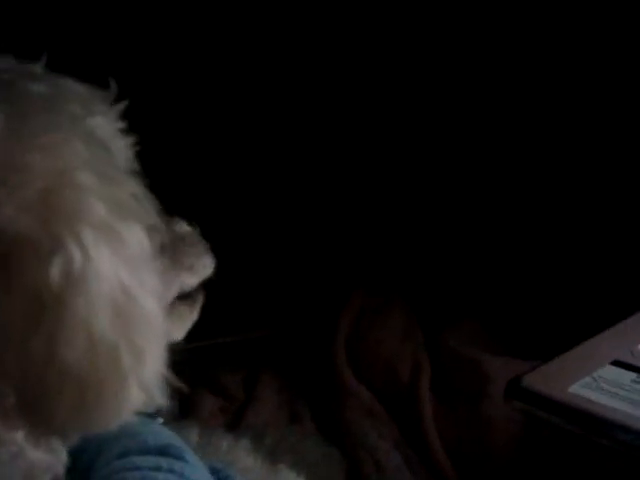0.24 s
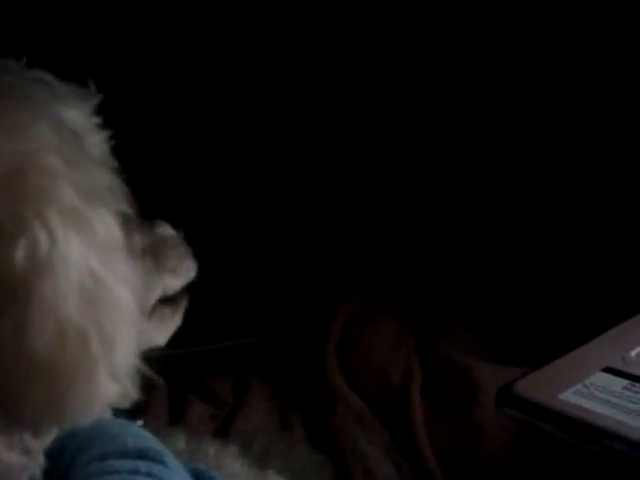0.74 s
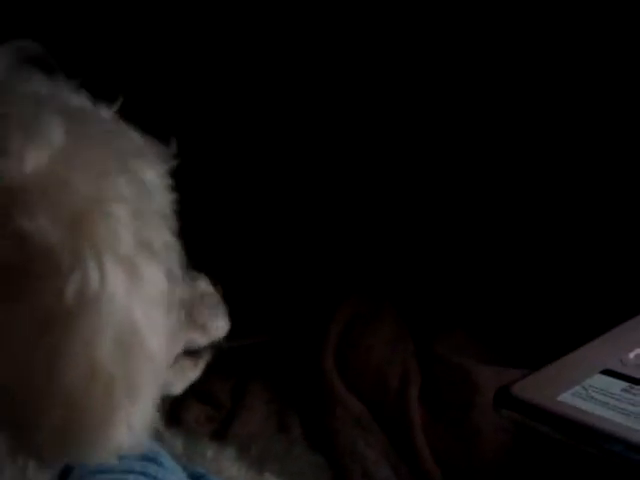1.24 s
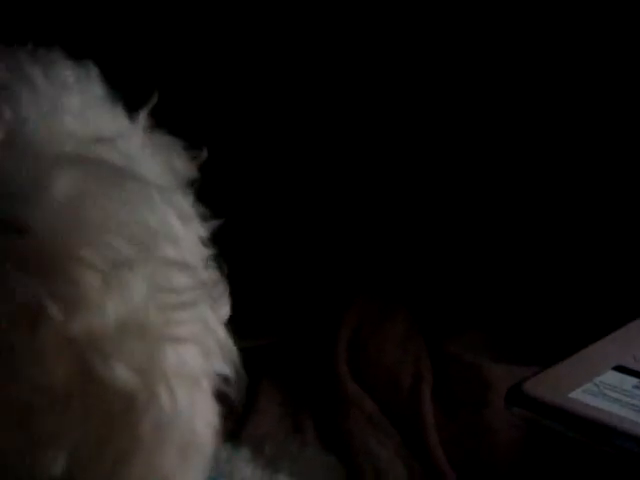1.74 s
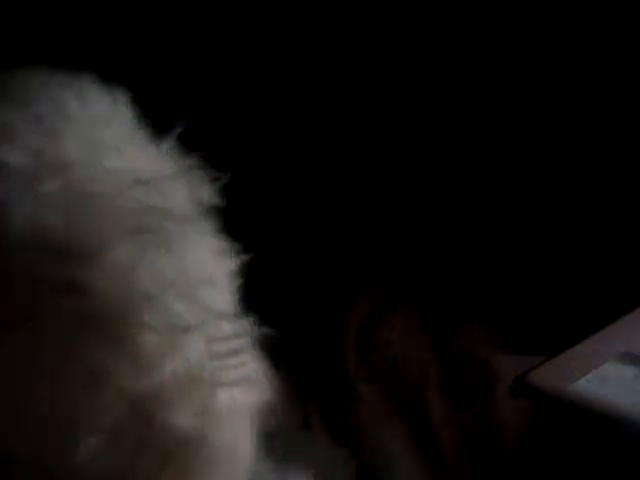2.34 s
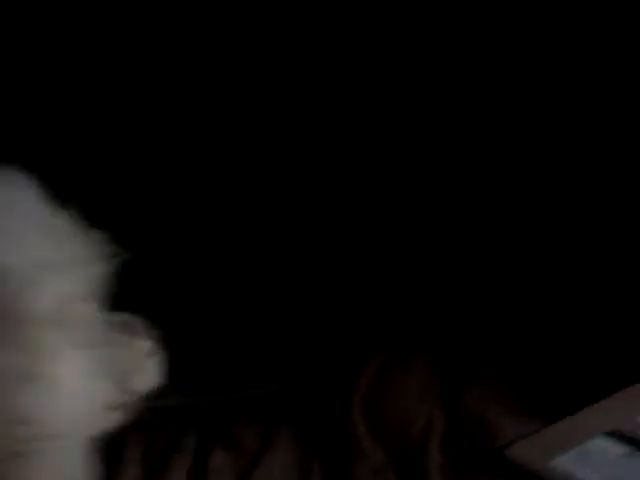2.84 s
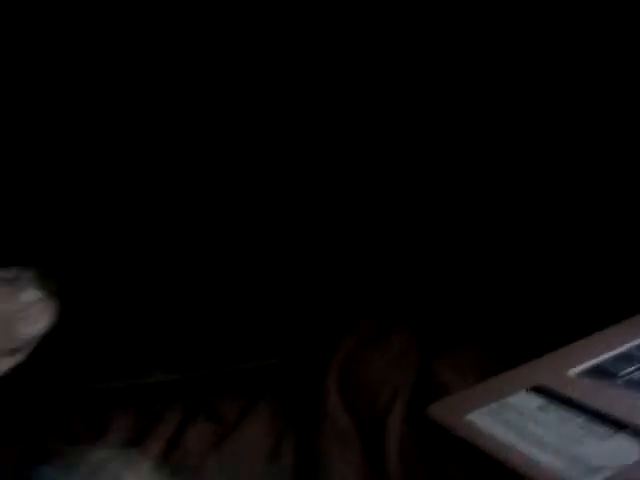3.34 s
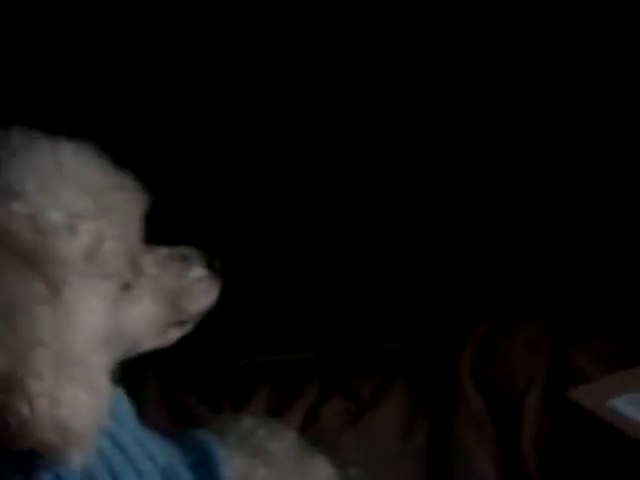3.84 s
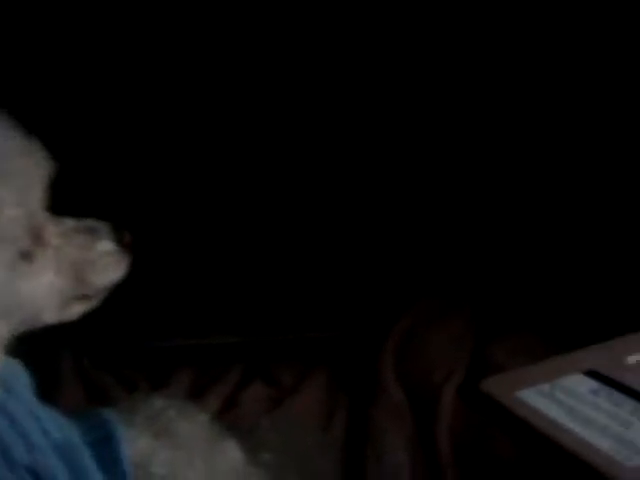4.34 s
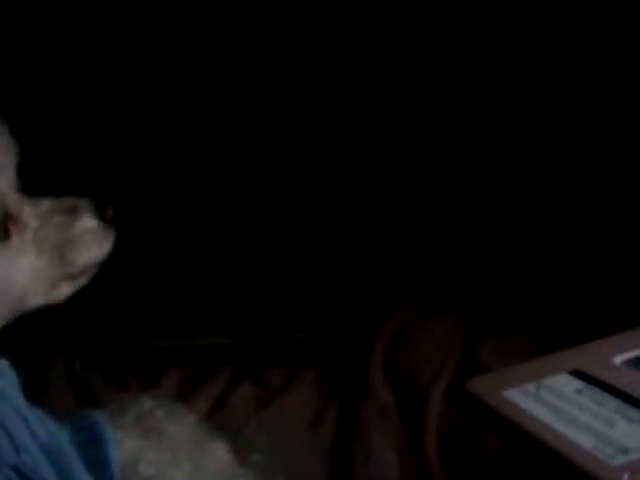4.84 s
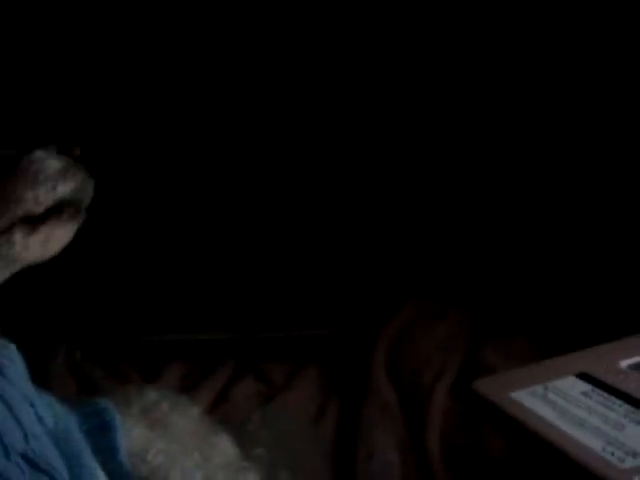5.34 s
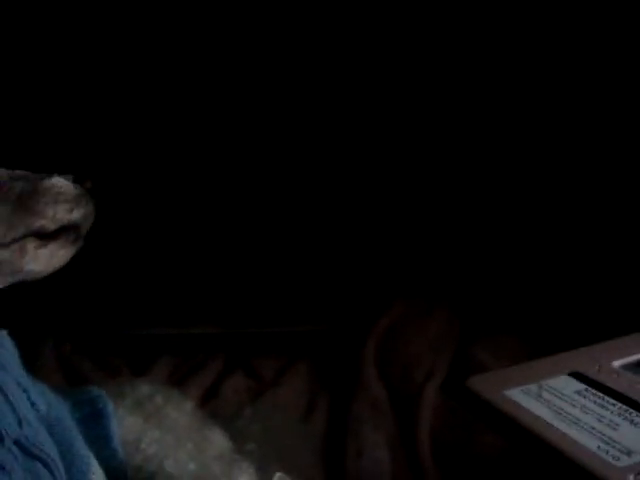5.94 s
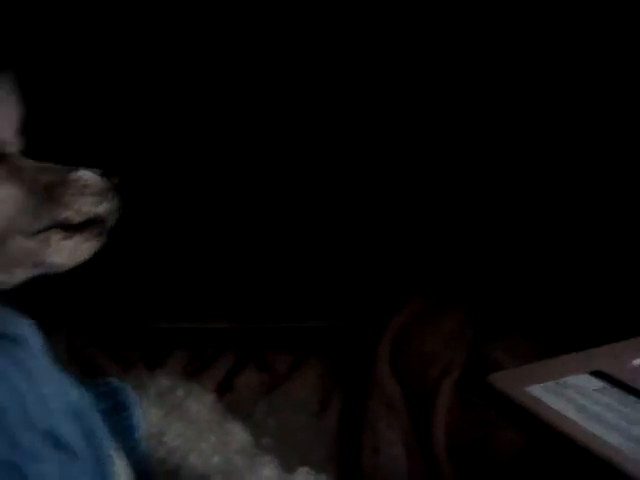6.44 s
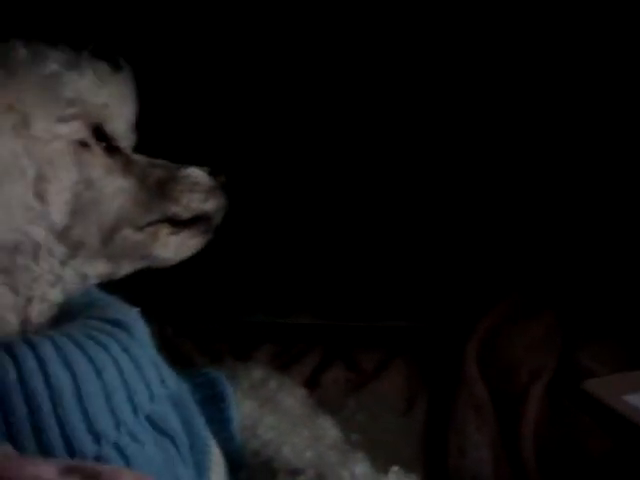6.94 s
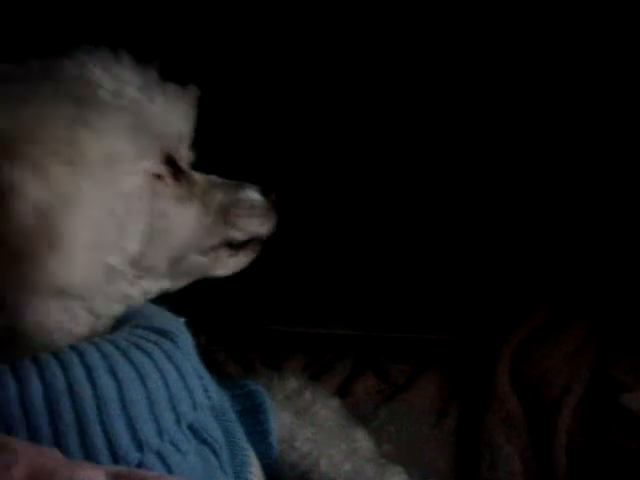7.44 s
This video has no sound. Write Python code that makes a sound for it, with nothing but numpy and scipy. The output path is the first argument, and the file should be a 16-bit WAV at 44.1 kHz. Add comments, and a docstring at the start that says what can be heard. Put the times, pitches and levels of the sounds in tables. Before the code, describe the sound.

A small dog complains close to the microphone in a quiet, echoing room. It starts with a soft snuffle, a thin whimper and one yip, then whines, once in a long downward slide. A light tap lands during a low grumble. A run of sharp, high yips follows, with small grunts and snuffles between them, over a faint steady hush.

```python
"""A quiet, echoing room, with a small dog complaining close to the microphone: thin whimpers, long
sliding whines, a grumble, then a run of sharp yips with small grunts between them. The voice is vocal
fold harmonics and breath rasp, shaped by throat and mouth; in a yip the pitch shoots up with doubled
periods, breaks into a clear register and falls away. Soft snuffles are air through the nose.
One light tap lands during the grumble, and a steady hush lies under it all."""
import sys
import numpy as np
from scipy import signal
from scipy.fft import rfft, irfft, next_fast_len
from scipy.io import wavfile
from scipy.ndimage import uniform_filter1d, map_coordinates

SR = 44100
rng = np.random.default_rng(int(sys.argv[2]) if len(sys.argv) > 2 else 0)


def master(y):
    """Save y as 16-bit WAV."""
    cut = np.clip(np.atleast_2d(y).T, -1, 1)
    pcm = np.round(cut * 32767)  # scale
    wavfile.write(sys.argv[1], SR, pcm.astype(np.int16))


N = 339129

# Yips. Rolloff darkens the overtones; halves are the growly lines between the harmonics. Columns:
# strained rise: start_s, rise_s, swell_s, first_hz, top_hz, level_db, halves_db, rolloff_db_per_octave,
# clear register: clear_hz, held_hz, hold_s, fall_s, clear_db, clear_rolloff_db_per_octave,
# whole yip: roughness_0_to_1, mouth_hz, mouth_lift_db, upper_hz, upper_lift_db, reverb_db
YIPS = [(1.434, .05, 0.0047, 1330, 1750, -16.5, 6.5, 2.5, 1478, 1270, 0.034, 0.1, -35.5, 12, 0.23, 2280, 24, 4370, 8, -10),
        (4.569, .033, 0.017, 1456, 1828, -17.5, -1, 6.5, 1215, 1686, .026, 0.066, -18, 5, 0.5, 2510, 21.5, 4910, 14.5, -4),
        (4.844, .031, .023, 1165, 1665, -17.5, 1.5, 5, 1036, 1043, 0.014, 0.0093, -14, 5.5, 0.05, 2120, 25, 4100, 8, -7.5),
        (5.105, .036, 0.034, 1341, 1634, -15, -9.5, 6.5, 1086, 1141, 0.015, 0.073, -22.5, 5.5, 0.59, 2080, 10.5, 4300, 8.5, -10.5),
        (5.778, .035, .025, 1236, 1702, -13.5, -1, 2.5, 1265, 1278, 0.032, 0.058, -21, 4, .3, 2370, 24.5, 4810, 11.5, -4),
        (6.108, .042, 0.031, 1027, 1739, -11, -6.5, 0, 1265, 1238, 0.05, 0.053, -18, 4, 0.54, 2406, 23, 4720, 14, -6.5),
        (7.301, .021, 0.0079, 1600, 1683, -16, 4, 7, 1183, 1402, 0.036, .045, -15, 2, 0.4, 2580, 30, 4030, 10.5, -4.5)]
# Contours of the drawn-out calls: time_s, pitch_hz, level_db, rolloff_db_per_octave
WHIMPER = [(1.075, 828, -42.5, 1), (1.089, 890, -32.5, -4), (1.11, 1310, -40, 14.5), (1.135, 1370, -28, 21),
           (1.158, 1298, -41.5, 3), (1.205, 1290, -38.5, 4.5), (1.225, 1150, -37.5, 9.5),
           (1.245, 1185, -49.5, 12)]
MOAN = [(1.555, 491, -48, 5.5), (1.59, 404.6, -34.5, 6.1), (1.603, 423, -56, 6), (1.615, 534, -38.5, 5.6),
        (1.66, 457, -33.5, 6.7), (1.715, 452.6, -36.5, 4.3), (1.77, 425, -31, 8.2), (1.872, 393, -34, 10.5),
        (1.895, 380, -40.5, 10)]
SHORT_WHINE = [(2.094, 810, -37.5, 2.8), (2.102, 708, -27.5, 2.5), (2.114, 872, -20.5, 8.6),
               (2.128, 1090, -22, 1.5), (2.157, 1339, -39, 3.5), (2.18, 1152, -27.5, 1),
               (2.212, 849, -24.5, 5), (2.255, 816, -21.5, 5.5), (2.313, 810.6, -18.5, 6.3),
               (2.347, 862, -27, 5)]
LONG_WHINE = [(2.526, 758, -36, -2), (2.541, 840, -21, 8.6), (2.553, 1007, -20.5, 3),
              (2.564, 1322, -32, 1.5), (2.595, 1490, -25, 0.5), (2.638, 1308, -38.5, 1),
              (2.667, 1107, -25.5, 2), (2.75, 881.5, -24, 0), (2.793, 800, -16, 7), (2.87, 725, -30.5, 4),
              (2.93, 648.7, -22, 3), (2.957, 561, -23.5, 2), (2.987, 510, -22.5, 6.5),
              (3.05, 432, -23, 5.5), (3.128, 398.7, -24, 5.8), (3.15, 415, -26.5, 9)]
GRUMBLE = [(3.35, 294.2, -37, 17.4), (3.375, 308.3, -32.5, 9.1), (3.445, 318, -30.5, 15),
           (3.53, 284, -35, 10), (3.585, 317.5, -30.5, 12.5), (3.665, 323, -33.5, 11.7),
           (3.705, 332, -39, 26)]
HIGH_SQUEAK = [(4.313, 824, -31.5, 11.5), (4.327, 1100, -34.5, 8), (4.345, 1344, -30.5, 2),
               (4.358, 1461, -23.5, 15), (4.373, 1441, -20.5, 8), (4.384, 1300, -33, 8),
               (4.412, 984, -33.5, 8)]
# Their voicing: contour, jaws_shut, roughness_0_to_1, halves_db, mouth_hz, mouth_lift_db, reverb_db
WHINES = [(WHIMPER, True, .12, -28.5, 3360, 24, -11.5), (MOAN, True, 0.35, -11, 2100, 11.3, -12),
          (SHORT_WHINE, True, .15, -39, 2090, 12, -12.5), (LONG_WHINE, True, 0.14, -29.5, 1850, 9.7, -11),
          (HIGH_SQUEAK, False, 0.39, -31, 5100, 6.5, -7.5), (GRUMBLE, False, 0.11, -1.5, 856, 18.6, -13.5)]
# Grunts: start_s, length_s, crest_hz, pitch_sag_0_to_1, level_db, roughness_0_to_1, halves_db,
# rolloff_db_per_octave, mouth_hz, mouth_lift_db, reverb_db
GRUNTS = [(1.418, 0.014, 834, 0.21, -25.5, 0.8, -18, 8.5, 820, 9, -18),
          (3.914, 0.042, 362, 0.11, -40, 0.4, -6, 13.5, 700, 14.5, -5.5),
          (4.118, 0.061, 396.2, 0.32, -33.5, 1, -8, 9.5, 716, 18, -8.5),
          (5.581, 0.065, 1057, 0.31, -28.5, 0.9, 1, 12.5, 4950, 12.5, -8.5),
          (6.652, 0.096, 661.4, 0.26, -34.5, 0.76, -1.5, 14, 4570, 15, -7.5),
          (6.893, 0.087, 570.7, .2, -31, 0.7, -11, 12, 4500, 14.5, -8)]
# Puffs through the nose: centre_s, length_s, level_db
SNUFFLES = [(0.325, 0.36, -44), (5.382, 0.11, -42), (6.464, 0.24, -45), (7.157, 0.056, -44),
            (7.611, .26, -41.5)]
# Tone of the throat and muzzle with jaws open, with jaws nearly shut, and of the nose: freq_hz, gain_db
OPEN_JAWS_EQ = [(150, -54), (440, -29.5), (610, -7), (820, -7), (1080, 3.5), (1250, -9.5), (1500, 10),
                (1900, -2), (2500, -0.5), (3250, -15), (3900, 1), (4750, 1), (6100, -1), (7000, -21.5)]
SHUT_JAWS_EQ = [(150, -55), (400, -27), (510, -32), (620, -11), (810, 4.5), (1040, -7.5), (1270, -17),
                (1480, -7), (1630, -14.5), (1900, -8), (2400, -21.5), (2850, -23.5), (3200, -29.5),
                (3750, -14), (5150, -19.5), (5800, -19.5), (7000, -41.5)]
NOSE_EQ = [(400, -22.5), (800, 3), (1150, -15.5), (1550, -9), (2200, -19.5), (7000, -51)]
# Cue for the tap: start_s, relative_level_db
TAPS = [(3.453, -17.5)]
# Body of the tapped object: freq_hz, gain_db
TAP_EQ = [(130, -48), (500, 1), (1500, -5), (4300, -9.5), (10000, -33)]
# Decay of the room's tail: freq_hz, t60_s
REVERB_DECAY = [(200, 0.76), (900, 0.87), (2500, 0.9), (5000, 0.9), (9000, 0.41)]
# Colour of that tail: freq_hz, gain_db
REVERB_EQ = [(300, -3.5), (800, -2.5), (1050, 6), (1500, -3.5), (2500, -1), (4500, -3.5), (8000, 1.5)]
# Colour of the room tone: freq_hz, gain_db
HUSH_EQ = [(15, -42.5), (25, -18.5), (119, -9.5), (273, -4), (486, -6), (565, -6), (846, -4.5), (1260, -9),
           (1470, -3.5), (2430, -16.5), (2970, -16), (4800, -16.5), (10200, -19), (13300, -49),
           (22000, -120)]


def dog():
    """All the dog's sounds. The head moves between calls, so the room answers each one differently."""
    track = np.zeros(N)
    for (start, sound), reverb_db in [*whines(), *grunts(), *yips()]:
        add(track, start, room(sound, reverb_db))
    return track + snuffles()


def yips(break_s=0.00498, end_hz=781, clear_halves_db=-24.5):
    """The pitch shoots up with doubled periods, breaks into the clear register, holds and falls away."""
    for (s, rise, swell, first_hz, top_hz, db, halves_db, rolloff, clear_hz, held_hz, hold, fall,
         clear_db, clear_rolloff, rough, *resonances, reverb_db) in YIPS:
        peak = min(swell / rise, 1)
        peak_hz = first_hz + peak * (top_hz - first_hz)
        clear_s = s + rise + break_s
        contour = [
            (s, first_hz, db - 18.5, rolloff + 13.5, halves_db),  # soft, dark onset
            (s + peak * rise, peak_hz, db, rolloff, halves_db),  # full strain
            (s + rise, top_hz, db - 17, rolloff, halves_db),  # the voice cracks
            (clear_s, clear_hz, clear_db, clear_rolloff, clear_halves_db),
            (clear_s + hold, held_hz, clear_db - 4, clear_rolloff, clear_halves_db),
            (clear_s + hold + fall, end_hz, clear_db - 23.5, 19, clear_halves_db)]  # almost a pure tone
        yield voice(contour, rough, (OPEN_JAWS_EQ, *resonances), rasp_db=-11), reverb_db


def whines():
    """Drawn-out calls, from whimper to grumble, gliding along their contours of pitch and effort."""
    for points, jaws_shut, rough, halves_db, mouth_hz, lift_db, reverb_db in WHINES:
        contour = [(*point, halves_db) for point in points]
        mouth = (SHUT_JAWS_EQ if jaws_shut else OPEN_JAWS_EQ, mouth_hz, lift_db)
        yield voice(contour, rough, mouth, pitch_follow=0.4), reverb_db


def grunts(edge_drop_db=7.5):
    """Each grunt is one short push: pitch and level rise and sink together in an arch."""
    progress = np.linspace(0, 1, num=9)
    droop = (2 * progress - 1) ** 2
    for s, length, hz, sag, db, rough, halves_db, rolloff, mouth_hz, lift_db, reverb_db in GRUNTS:
        contour = [(s + length * x, hz * (1 - sag * d), db - edge_drop_db * d, rolloff, halves_db)
                   for x, d in zip(progress, droop)]
        yield voice(contour, rough, (OPEN_JAWS_EQ, mouth_hz, lift_db)), reverb_db


def voice(contour, rough, mouth, rasp_db=-12, pitch_follow=0, fade_s=0.0044, shimmer_db=1.5):
    """The vocal folds buzz through the mouth along a contour; returns the start time and the sound."""
    times, *controls = np.transpose(contour)
    t = np.arange(times[0] - fade_s, times[-1] + fade_s, 1 / SR)
    size = len(t)
    hz, db, rolloff, halves_db = [np.interp(t, times, control) for control in controls]
    jitter = (.005 + .035 * rough) * wobble(650, size)
    pitch = uniform_filter1d(hz, size=90) * (1 + jitter)
    phase = 2 * np.pi * np.cumsum(pitch) / SR
    orders = np.arange(1, 21)
    # The mouth may close as the pitch sinks, which pulls its resonance down.
    eq, mouth_hz, *lifts = mouth
    moving_mouth = (eq, mouth_hz * (hz / hz.mean()) ** pitch_follow, *lifts)
    tone = partials(orders, pitch, phase, moving_mouth, rolloff)
    # Under strain every second cycle differs, which puts lines halfway between the harmonics.
    tone += amp(halves_db) * partials(orders - .5, pitch, phase, moving_mouth, rolloff)
    # Air rasps through the folds once a cycle, more so the rougher the voice is.
    puffs = rng.standard_normal(size) * (1 + np.cos(phase))
    breath = filtered(puffs, lambda f: tract(f, *mouth) * amp(-rolloff.mean() * np.log2(1 + f / hz.mean())))
    rasp = rough * amp(rasp_db) * unit(breath)
    fade = np.clip(np.minimum(t - t[0], t[-1] - t) / fade_s, 0, 1)
    level = amp(db + shimmer_db * wobble(160, size))
    return t[0], (tone + rasp) * fade * level


def partials(orders, pitch, phase, mouth, rolloff):
    """A stack of partials at rms 1; each swells as it passes a resonance and flutters on its own."""
    size = len(pitch)
    hz = orders[:, None] * pitch
    flutter_db = np.array([2.5 * wobble(170, size) + 3 * wobble(22, size) for _ in orders])
    octaves_up = np.log2(np.maximum(orders[:, None], 1))
    weight = tract(hz, *mouth) * amp(flutter_db - rolloff * octaves_up)
    weight /= np.linalg.norm(weight, axis=0)
    start_phase = rng.uniform(0, 2 * np.pi, (len(orders), 1))
    # No two closures of the folds are alike, which frays the highest partials most.
    fray = hz / 6000 * np.array([wobble(380, size) for _ in orders])
    return np.sqrt(2) * np.sum(weight * np.sin(orders[:, None] * phase + start_phase + fray), axis=0)


def tract(hz, eq, mouth_hz, lift_db, upper_hz=4800, upper_db=0):
    """Gain of the throat, lifted at the mouth's resonance; a wide open mouth adds an upper one."""
    def lift(centre_hz, db, q):
        detune = hz / centre_hz - centre_hz / (hz + 1)
        return 1 + (amp(db) - 1) / (1 + (q * detune) ** 2)
    return amp(along(eq, hz)) * lift(mouth_hz, lift_db, q=6.2) * lift(upper_hz, upper_db, q=6)


def snuffles():
    """Soft, unvoiced whimpers: air swells and fades through the nose."""
    track = np.zeros(N)
    for centre_s, length, db in SNUFFLES:
        size = int(length * SR)
        swell = np.sin(np.linspace(0, np.pi, size))
        add(track, centre_s - length / 2, amp(db) * swell * noise(NOSE_EQ, size))
    return track


def tap(t60_s=0.014, lead_s=0.01):
    """A light, dead knock of something small and hard."""
    track = np.zeros(N)
    t = np.arange(SR // 10) / SR - lead_s
    for s, db in TAPS:
        envelope = 2 * (t >= 0) * amp(db + 5 - 60 * abs(t) / t60_s)
        crack = envelope * rng.standard_normal(len(t))
        knock = filtered(crack, lambda hz: amp(along(TAP_EQ, hz)))
        add(track, s - lead_s, room(knock, reverb_db=-27))
    return track


def room(x, reverb_db, build_s=0.0061, echo_count=14):
    """The direct sound, early reflections off small things nearby and the diffuse tail of the walls."""
    hz, t, wash = signal.stft(rng.standard_normal(SR), SR, nperseg=256)
    decay = amp(along(REVERB_EQ, hz)[:, None] - 60 * t / along(REVERB_DECAY, hz)[:, None])
    build = 1 - np.exp(-t / build_s)
    tail = signal.istft(wash * decay * build, SR, nperseg=256)[1]
    polarity = rng.choice([-1, 1], echo_count)
    delays_s = rng.uniform(.002, .028, echo_count)
    early = np.zeros(len(tail))
    early[(SR * delays_s).astype(int)] = .6 * polarity / np.sqrt(echo_count)
    # Small surfaces throw back only the short waves.
    early = signal.lfilter(*signal.butter(1, 2200, "high", fs=SR), early)
    response = amp(reverb_db) * tail / np.linalg.norm(tail) + early
    response[0] = 1  # direct sound
    return signal.fftconvolve(x, response)


def hush(level_db=-50.5):
    """Room tone: a faint, steady bed of noise."""
    return amp(level_db) * noise(HUSH_EQ, N)


def amp(db):
    """Decibels to gain."""
    return 10 ** (np.asarray(db) / 20)


def unit(x):
    """x at rms 1."""
    return x / np.sqrt(np.mean(x ** 2) + 1e-20)


def along(points, hz):
    """Read a curve of (freq_hz, value) points on a log frequency axis."""
    freqs, values = np.transpose(points)
    return np.interp(np.log(hz + 1), np.log(freqs), values)


def wobble(rate, size):
    """A smooth random modulator, rate knots a second."""
    knots = rng.standard_normal(int(size * rate / SR) + 4)
    return map_coordinates(knots, [np.arange(size) * rate / SR])


def filtered(x, gain):
    """Equalise x with a gain that depends on frequency."""
    padded = next_fast_len(len(x) + SR // 4)
    return irfft(rfft(x, padded) * gain(np.fft.rfftfreq(padded, 1 / SR)), padded)[:len(x)]


def noise(eq, size):
    """Noise at rms 1, coloured by an EQ curve."""
    return unit(filtered(rng.standard_normal(size), lambda hz: amp(along(eq, hz))))


def add(track, s, x):
    """Mix x into the track from time s on."""
    start = round(s * SR)
    track[start:start + len(x)] += x[:N - start]


def scene():
    """The dog and the tap over the hush of the room, in mono."""
    return (dog() + tap() + hush())[None]


def record(dry, ceiling=1.25, top_hz=10250):
    """The microphone rounds off the loudest yips, adding a harsh edge; nothing passes above top_hz."""
    rounded = ceiling * np.tanh(dry / ceiling)
    return np.array([filtered(x, lambda hz: hz < top_hz) for x in rounded])


dry = scene()
out = record(dry)
master(out)
```